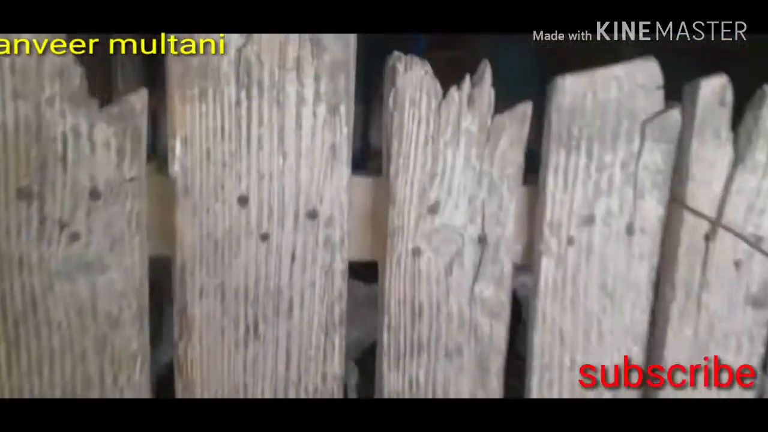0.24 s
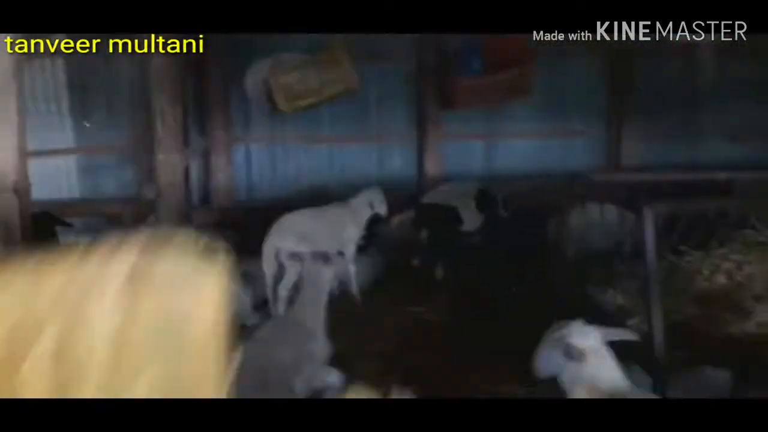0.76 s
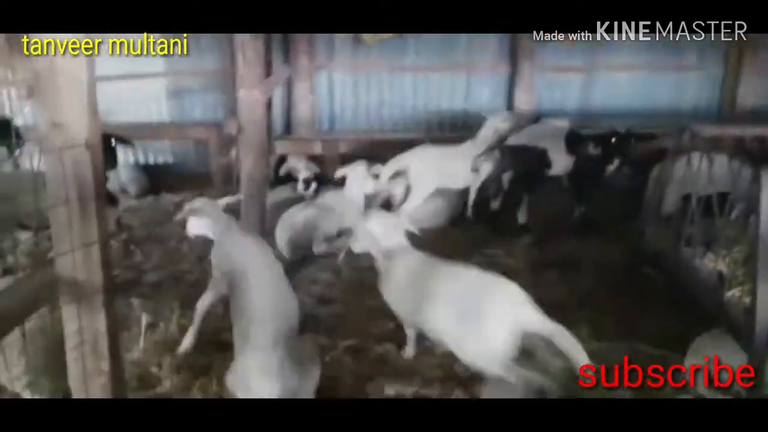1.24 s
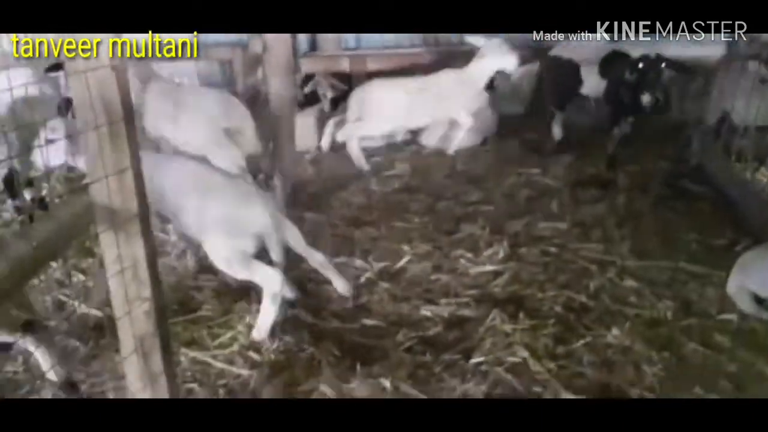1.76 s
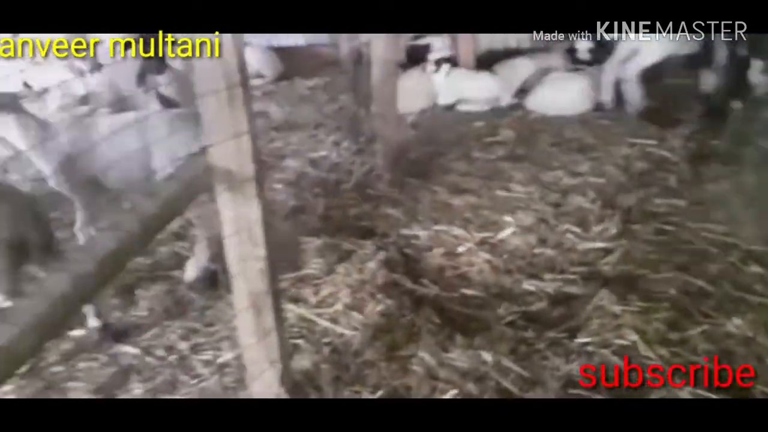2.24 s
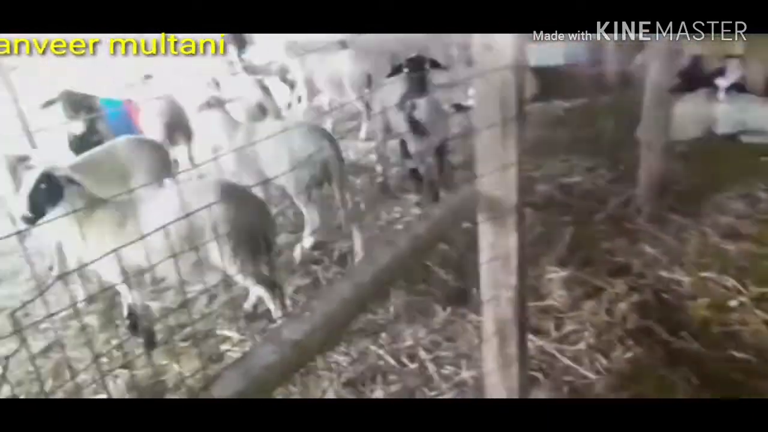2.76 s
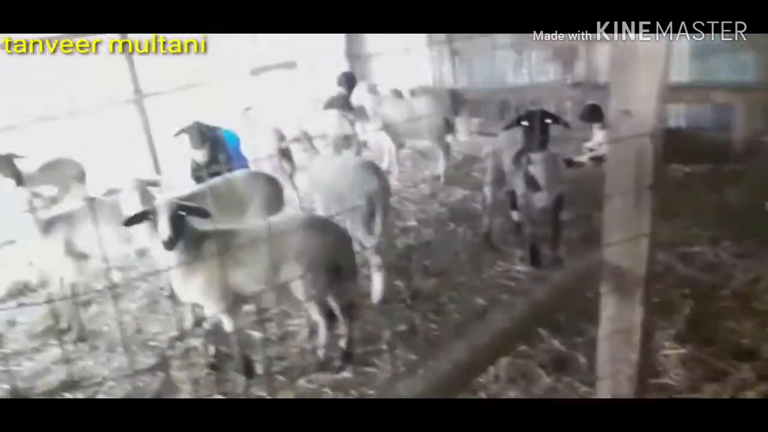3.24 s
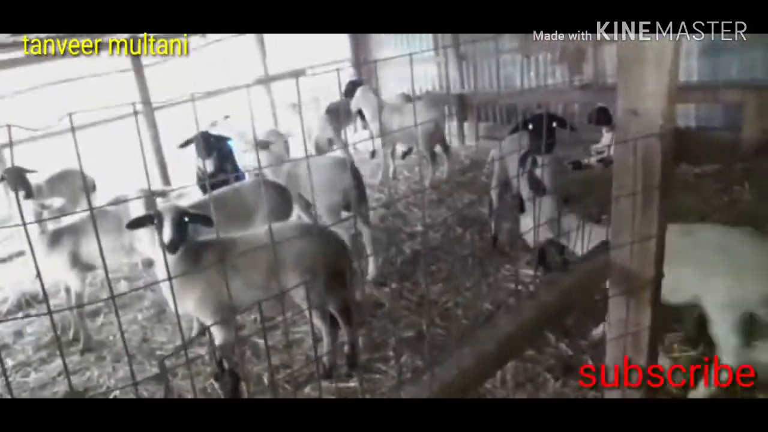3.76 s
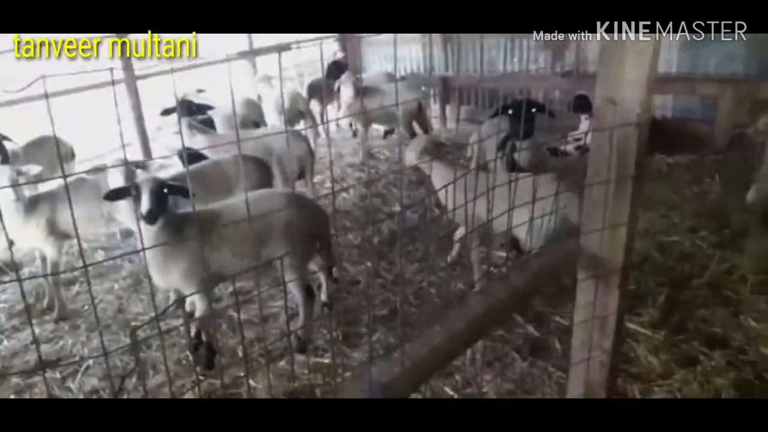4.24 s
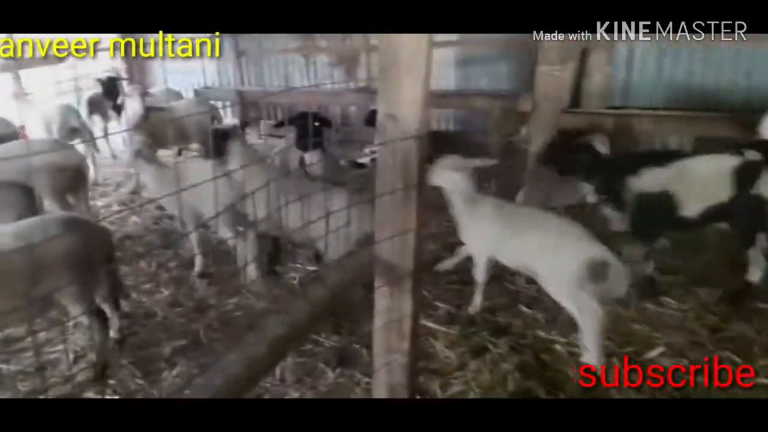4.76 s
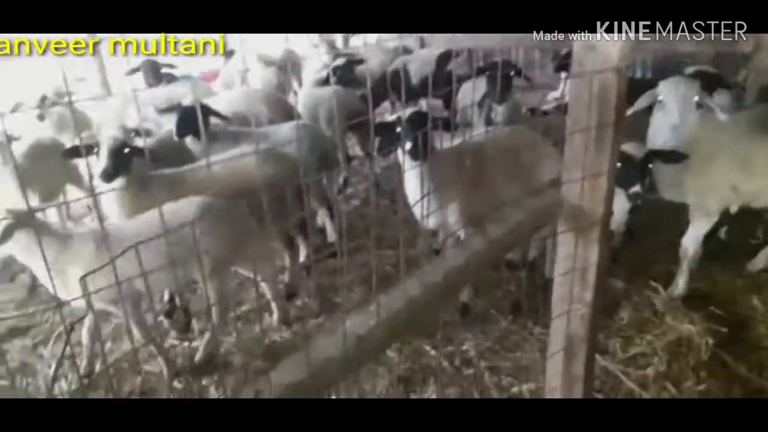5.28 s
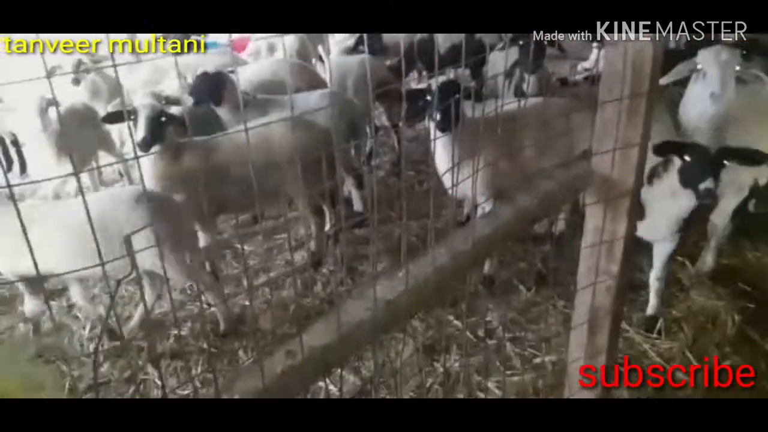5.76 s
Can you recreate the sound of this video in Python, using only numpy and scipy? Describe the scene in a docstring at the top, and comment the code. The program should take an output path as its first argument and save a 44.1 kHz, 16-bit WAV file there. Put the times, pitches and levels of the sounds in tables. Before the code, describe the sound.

From the start, sheep scramble over straw in a barn: uneven, quick hoof thuds with a hollow low ring and deep thump, mixed with dead woody knocks. Dry, bright straw swishes and crackles run underneath, along with the lumpy low rumble and dull scuffing of the farther flock. A hard, sharp knock stands out at about 1.0 second, with more strong hits near 1.6 and 2.0 to 2.2, and the rumble swells around 2.3. From 2.5 to 4 the steps are sparser, with a cracking pair near 3.3 and a thud at 3.6. Footfalls thicken again from 4.1 to 4.6, with a brisk straw sweep near 4.5 and a final thud and knock at 4.86. The sound drops out around 4.9, returning by 5.0 with only faint straw rustle and shuffling, a soft step near 5.7, until 6. Short barn reflections surround the close hits.

```python
"""Straw swishes and hooves thud and knock as sheep bolt across a pen in a tin-walled barn, then settle.
Straw and the far flock are coloured noise with random snaps and steps, shaped by level curves.
Near hooves are clicks with echoes and a scattered tail: thuds ring and thump on the packed bedding,
knocks on something hard have a woody body and a sharp edge.
Near the end the sound drops out for an instant and returns with only quiet shuffling."""
import sys
import numpy as np
from scipy import signal
from scipy.fft import rfft, irfft, next_fast_len
from scipy.io import wavfile

SR = 44100
rng = np.random.default_rng(int(sys.argv[2]) if len(sys.argv) > 2 else 0)


def transcribe(u):
    """Save the signal u as a 16-bit wav file named by the first command-line argument.

    u: samples, shape (n,) or (channels, n), limited to [-1, 1]; the rate is SR.
    q: integer samples, one column per channel.
    """
    v = np.clip(np.atleast_2d(u).T, -1, 1)
    q = np.round(v * 32767).astype(np.int16)
    wavfile.write(sys.argv[1], SR, q)


N = 265217
TIME = np.arange(N) / SR
HIT_TIME = TIME[:SR // 3]
EARLY = SR // 30   # samples at the start of a hit that set its level
SETTLED_S = 4.92   # the run ends


def from_db(db):
    """Decibels to gain."""
    return 10 ** (np.asarray(db) / 20)


def rms_one(x, size=None):
    """Scale to rms 1, judged over the first size samples."""
    return x / np.sqrt(np.mean(x[..., :size] ** 2) + 1e-20)


def in_time(rows):
    """One curve over time for each column of a table."""
    s, *columns = np.transpose(rows)
    return [np.interp(TIME, s, column) for column in columns]


def until_settled(running_db, settled_db):
    """One level while the flock runs, then at once that of its shuffling."""
    return np.where(TIME < SETTLED_S, running_db, settled_db)


def at_hz(points, hz):
    """Read a spectrum on a log-frequency axis."""
    known, value = np.transpose(points)
    return np.interp(np.log(hz + 1e-9), np.log(known), value)


def add(out, s, sound):
    """Mix a sound in at time s."""
    start = max(round(s * SR), 0)
    out[:, start:start + sound.shape[-1]] += sound[:, :N - start]


def noise():
    """Two unrelated white noises."""
    return rng.standard_normal((2, N))


def grains(per_s, spread_db):
    """Single-sample snaps at random moments, of uneven size."""
    sizes = from_db(spread_db * np.minimum(rng.exponential(1, N), 4))
    happens = rng.random(N) < per_s / SR
    return rms_one(noise() * sizes * happens)


def drift(per_s):
    """Smooth random wander with spread 1, computed at every 40th sample."""
    r = np.exp(-80 * np.pi * per_s / SR)
    steps = rng.standard_normal(N // 40 + 2002)
    slow = signal.lfilter([1], [1, -2 * r, r * r], steps)[2000:]   # skip the run-in
    return np.interp(np.arange(N) / 40, np.arange(len(slow)), rms_one(slow))


def resonance(x, hz, width_hz):
    """A two-pole resonance: energy rings at one pitch, the longer the narrower it is."""
    r = np.exp(-np.pi * width_hz / SR)
    return signal.lfilter([1 - r, 0, r - 1], [1, -2 * r * np.cos(2 * np.pi * hz / SR), r * r], x)


def soften(x, hz):
    """A soft contact loses its top."""
    return signal.sosfilt(signal.butter(2, hz, fs=SR, output="sos"), x)


def band(x, low_hz, high_hz, order=2):
    """Keep what lies between two edges."""
    return signal.sosfilt(signal.butter(order, [low_hz, high_hz], "band", fs=SR, output="sos"), x)


def coloured(colour, source):
    """Give two unrelated sources, as mid and side, a colour and the stereo width of the barn; rms 1."""
    # stereo width: (frequency [Hz], side minus mid [dB])
    width_curve = [(60, -37), (160, -14.5), (330, -13.5), (500, -5.5), (900, 0), (3000, 1), (15000, 0)]
    # stereo balance: (frequency [Hz], left minus right [dB])
    lean_curve = [(60, -0.5), (110, 1), (200, 0), (380, -1), (700, 0.5), (1290, -1.5), (2380, 0),
                  (4400, -1.5), (8120, -3), (15000, 6.5)]
    size = next_fast_len(N)
    hz = np.arange(size // 2 + 1) * SR / size
    mid, side = rfft(source, size) * from_db(at_hz(colour, hz)) * (hz > 15)
    width = from_db(at_hz(width_curve, hz))
    signs = np.array([[1], [-1]])   # left, right
    both = (mid + signs * width * side) / np.hypot(1, width)
    both = both * from_db(signs * at_hz(lean_curve, hz) / 2)
    return rms_one(irfft(both, size)[:, :N])


def blow(t60_s, scatter, side_share, lag_s=0.00017, wander=0.066, build_s=0.0012):
    """One contact as the barn returns it: direct click, first echoes and scattered reflections."""
    # first echoes from floor, wall and roof: (typical delay [s], share of the direct click)
    echoes = [(.0094, 0.5), (0.0126, 0.49), (0.023, 0.33)]
    mid, side = rng.standard_normal((2, len(HIT_TIME)))
    tail = (1 - np.exp(-HIT_TIME / build_s)) * from_db(-60 * HIT_TIME / t60_s)
    out = scatter * tail * (mid + side_share * side * [[1], [-1]])
    for delay, share in [(0.00047, 1)] + echoes:
        # every path arrives from its own side, so one ear gets it a little later
        arrival = delay * np.exp(wander * rng.standard_normal()) + lag_s * rng.permutation(2)
        out[[0, 1], np.round(arrival * SR).astype(int)] += share
    return out


def straw(stir_db=2.0, sweep_db=0.5, settled_db=-58.5, flutter_db=1.06, snap_share=0.29):
    """Countless stalks rub and snap; leg sweeps swell, hold and die away over the steady stirring."""
    # steady stirring under the running flock: (time [s], level before stir_db [dB])
    stirring_curve = [(0.0, -48.5), (0.29, -46.5), (2.2, -45), (3.08, -46), (4.33, -45), (4.71, -40.5),
                      (4.75, -43)]
    # legs sweep through the straw: (time [s], length before release [s], level before sweep_db [dB])
    sweeps = [(.132,.02,-42.5),(0.215,0.056,-40.5),(.315,.06,-40.5),(0.465,0.043,-40),(0.607,0.042,-41),(.73,0.052,-39.5),(0.886,0.12,-41.5),(0.971,0.042,-32.5),
              (1.153,0.068,-42),(1.342,.04,-44.5),(1.433,0.12,-44),(1.648,0.018,-34),(1.846,0.0078,-37),(1.94,0.12,-43),(2.094,0.084,-41.5),(2.46,.03,-43.5),
              (2.894,0.007,-36.5),(3.104,0.053,-46),(3.29,0.078,-45.5),(3.709,0.038,-41.5),(3.815,0.12,-41.5),(4.13,0.029,-40),(4.422,0.054,-38.5),
              (4.487,0.0071,-29.5),(4.592,0.051,-35.5),(4.781,.02,-35.5),(4.842,0.034,-34),(5.056,0.054,-57.5),(5.123,0.23,-53),(5.577,0.095,-52.5),(5.79,0.031,-51.5),(5.968,0.058,-54)]
    # spectrum of the straw: (frequency [Hz], relative level [dB])
    straw_colour = [(1100, -3), (1700, -2), (2200, -2), (3200, -1.5), (4100, 0), (5000, -2), (6840, -3),
                    (8910, 0), (10300, -3), (12700, -0.5), (15100, -4.5), (16000, -15)]
    attack_s, shortest_release_s, release_per_length = 0.0035, 0.014, 0.34
    stirring, = in_time(stirring_curve)
    power = from_db(until_settled(stirring + stir_db, settled_db)) ** 2 * np.ones((1, N))
    t = TIME[:SR]
    for s, length, level in sweeps:
        # a longer sweep also dies away more slowly
        release_s = shortest_release_s + release_per_length * length
        swell = (1 - np.exp(-t / attack_s)) * np.exp(-np.maximum(t - length, 0) / release_s)
        add(power, s, (from_db(level + sweep_db) * swell[None]) ** 2)
    stalks = noise() + snap_share * grains(per_s=2500, spread_db=2.5)
    flutter = from_db(flutter_db * drift(45))
    return np.sqrt(power) * flutter * coloured(straw_colour, stalks)


def flock(rumble_db=-0.2, scuff_db=2.5, shuffle_db=-1.26, lumpy_db=2.5, scuff_lumpy_db=2.0,
          step_share=0.63):
    """Many lighter far steps merge into a lumpy rumble with dull scuffing, then quiet shuffling."""
    # levels before the trims above
    # running footfall: (time [s], rumble level [dB], scuffing level [dB])
    running = [(0.0, -32, -42.5), (0.86, -35.5, -49), (1.59, -31, -45), (1.98, -32, -50.5),
               (2.27, -24.5, -48), (2.5, -33, -52), (3.35, -36.5, -50), (3.47, -33, -46.5),
               (3.93, -37.5, -53), (4.44, -26, -46.5), (4.72, -33, -46), (4.75, -31.5, -51)]
    # settled shuffling: (time [s], rumble level [dB], scuffing level [dB])
    shuffling = [(5.06, -46.5, -63.5), (5.934, -41.5, -56.5), (6.0, -42.5, -63)]
    # spectrum of the rumble: (frequency [Hz], relative level [dB])
    rumble_colour = [(25, -28), (52, -3.5), (70, -3), (118, 3), (148, -7.5), (194, -6.5), (257, -7),
                     (300, -1), (345, -1), (390, -8.5), (450, -19.5), (630, -31.5), (900, -47), (1500, -87)]
    # spectrum of the scuffing: (frequency [Hz], relative level [dB])
    scuff_colour = [(260, -23.5), (450, -0.5), (630, -7.5), (790, -7.5), (1090, -10), (1400, -16),
                    (3000, -21.5), (4000, -29.5), (6600, -79)]
    settled = np.array(in_time(shuffling)) + shuffle_db
    rumble_level, scuff_level = until_settled(in_time(running), settled)
    tread = drift(11.4)   # shared, so rumble and scuffing swell together
    rumble = coloured(rumble_colour, noise() + step_share * grains(per_s=60, spread_db=2.5))
    scuffs = coloured(scuff_colour, noise() + step_share * grains(per_s=110, spread_db=0.5))
    rumble = rumble * from_db(rumble_level + rumble_db + lumpy_db * tread)
    scuffs = scuffs * from_db(scuff_level + scuff_db + scuff_lumpy_db * tread)
    return rumble + scuffs


def knocks(body_db=-4.0, edge_db=-2.5, body_width_hz=260, body_low_hz=480, body_high_hz=1250,
           edge_low_hz=1250, typical_scatter=0.059):
    """Hoof on wood and stone: a dead woody body with its own pitch, and an edge that gives the crack."""
    # hard contacts, levels before the trims above:
    # (time [s], body level [dB], sharp edge level [dB], body pitch [Hz])
    contacts = [(.058,-38,-59.5,710),(.078,-31.5,-52,920),(.135,-49,-62,590),(.24,-29.5,-50,670),(.394,-35,-35.5,705),(.576,-25.5,-40.5,715),(.652,-36,-44,724),
                (.998,-22.5,-27,1040),(1.028,-33.5,-45,835),(1.12,-38,-40.5,630),(1.354,-35.5,-50,900),(1.449,-38,-51,740),(1.467,-38,-59,720),
                (1.582,-31.5,-35.5,616),(1.676,-34.5,-32.5,753),(2.04,-32.5,-38,604),(2.075,-33,-39,622),(2.175,-29.5,-52,667),(2.274,-36.5,-46,950),
                (2.711,-42.5,-58,1080),(2.855,-44.5,-48,743),(3.29,-30,-32,694),(3.321,-31.5,-37.5,776),(3.366,-35.5,-50,680),(3.454,-39,-53,940),(3.49,-35,-43,900),
                (3.597,-38,-44.5,676),(3.702,-41,-58,960),(3.984,-44.5,-46,1030),(4.073,-33.5,-42.5,630),(4.122,-36.5,-42,717),(4.42,-30,-44,955),(4.501,-38,-47,810),
                (4.602,-42,-50,636),(4.635,-38.5,-63,930),(4.725,-53,-42,1240),(4.8,-33,-40,600),(4.865,-33.5,-40,683),(5.65,-47,-62,640)]
    # a sharper edge reaches higher: (edge level before its trim [dB], top of the edge [Hz])
    edge_reach = [(-55, 1900), (-40.5, 2500), (-31.5, 2540), (-27.5, 3900)]
    # ring of the struck boards: (frequency [Hz], width [Hz], gain [dB])
    boards = [(1150, 18, -7), (1497, 50, -2), (1980, 28, -7)]
    # a louder knock is nearer: dB less scatter per dB of body above the typical level
    typical_db, near_is_dry = -33.5, 0.29
    out = np.zeros((2, N))
    for s, body_level, edge_level, hz in contacts:
        wet = typical_scatter * from_db(-near_is_dry * (body_level - typical_db))
        hit = blow(t60_s=0.17, scatter=wet, side_share=0.93)
        ringing = sum(from_db(db) * resonance(hit, mode_hz, width_hz) for mode_hz, width_hz, db in boards)
        hit = hit + ringing
        body = band(resonance(hit, hz, body_width_hz), body_low_hz, body_high_hz)
        top_hz = np.interp(edge_level, *np.transpose(edge_reach))
        edge = band(hit, min(edge_low_hz, top_hz / np.sqrt(2)), top_hz)   # at least half an octave
        body = from_db(body_level + body_db) * rms_one(body, size=EARLY)
        edge = from_db(edge_level + edge_db) * rms_one(edge, size=EARLY)
        add(out, s, body - edge)   # the edge has opposite polarity
    return out


def thuds(ring_db=0.23, thump_db=-3.0, ring_width_hz=30.7, ring_low_hz=150, ring_high_hz=500,
          thump_hz=100.6, thump_width_hz=112, thump_soft_hz=200):
    """Each near footfall on the bedding and its echoes excite a hollow ring and a deep thump."""
    # footfalls, levels before the trims above:
    # (time [s], hollow ring level [dB], deep thump level [dB], ring pitch [Hz])
    footfalls = [(0.064,-31,-41,346),(0.132,-17,-24.5,303),(.216,-28,-36,268),(.242,-28.5,-33,221),(.321,-36.5,-41,350),(.397,-26.5,-51,260),(.497,-35.5,-29,335),
                 (.577,-18.5,-17,288),(.621,-30,-26,324),(.65,-24.5,-21,271),(.747,-25,-25,302),(.894,-30.5,-26,253),(.997,-15,-22,362.6),
                 (1.028,-21.5,-20,347),(1.118,-21.5,-47,303),(1.18,-32.5,-30.5,344),(1.355,-29.5,-46,269),(1.456,-32.5,-37,260),(1.563,-28.5,-38,336),(1.584,-18,-18,335),
                 (1.685,-18,-50,310),(1.87,-27,-46,246),(2.042,-20,-28,331),(2.072,-20,-18,299),(2.177,-20.5,-23,325),(2.207,-34,-32,290),
                 (2.311,-26,-52,313),(2.409,-22,-50,334),(2.499,-29.5,-54,338),(2.647,-32.5,-34,295),(2.829,-30,-34,303),(3.091,-40,-29,262),
                 (3.359,-31.5,-28,320),(3.546,-34,-46,290),(3.596,-20.5,-47,287),(3.717,-34,-33,311),(4.076,-23,-28,299),(4.154,-20,-25.5,318),
                 (4.299,-28.5,-20.5,337),(4.373,-29,-33.5,328),(4.414,-27.5,-34,348),(4.498,-25.5,-25,317),(4.528,-32,-17,277),(4.566,-31.5,-24,340),(4.86,-23,-20.5,302),
                 (5.675,-36,-48.5,311)]
    out = np.zeros((2, N))
    for s, ring_level, thump_level, hz in footfalls:
        step = blow(t60_s=0.22, scatter=0.032, side_share=0.12)
        ring = band(resonance(step, hz, ring_width_hz), ring_low_hz, ring_high_hz)
        thump = soften(resonance(step, thump_hz, thump_width_hz), thump_soft_hz)
        ring = from_db(ring_level + ring_db) * rms_one(ring, size=EARLY)
        thump = from_db(thump_level + thump_db) * rms_one(thump, size=EARLY)
        add(out, s, ring + thump)
    return out


def scene():
    """Straw and the rest of the flock under the near hooves."""
    return straw() + flock() + knocks() + thuds()


def record(dry, low_cut_hz=42, top_cut_hz=15600):
    """The microphone sheds the deepest bass, the sound drops out once, the top is cut."""
    # brief dropout, then slightly raised to the end: (time [s], gain [dB])
    dropout = [(4.878, 0), (4.884, -16.5), (4.905, -47.5), (4.94, -48.5), (4.99, -7), (5.01, 1.5),
               (5.06, 3.5)]
    gain_db, = in_time(dropout)
    low_cut = signal.butter(3, low_cut_hz, "high", fs=SR, output="sos")
    top_cut = signal.ellip(12, 0.1, 90, top_cut_hz, fs=SR, output="sos")
    heard = signal.sosfilt(low_cut, dry) * from_db(gain_db)
    return signal.sosfilt(top_cut, heard)


dry = scene()
out = record(dry)
transcribe(out)
```